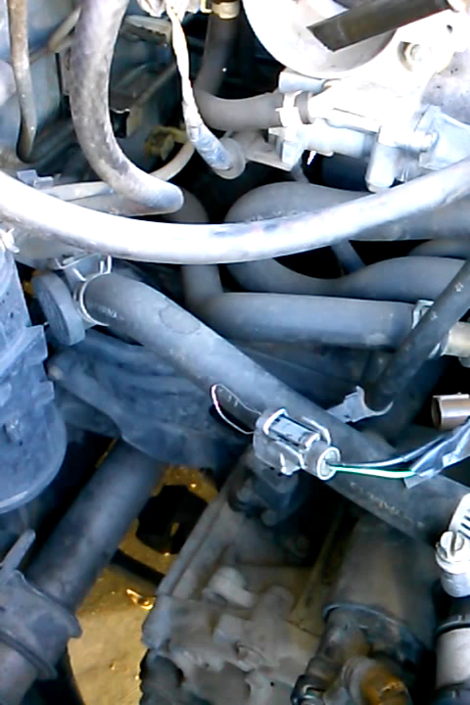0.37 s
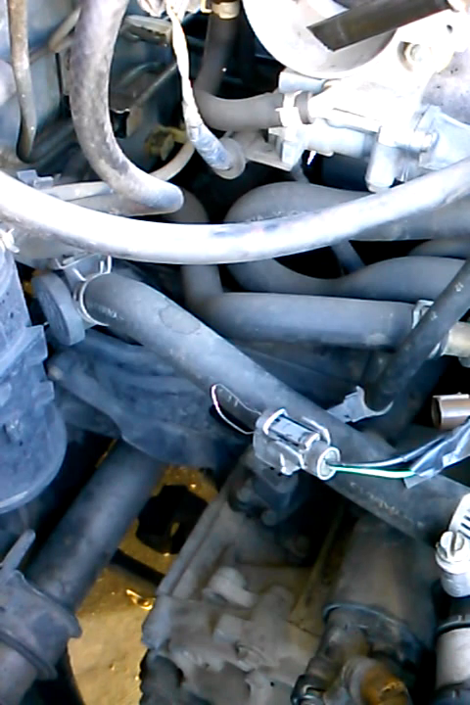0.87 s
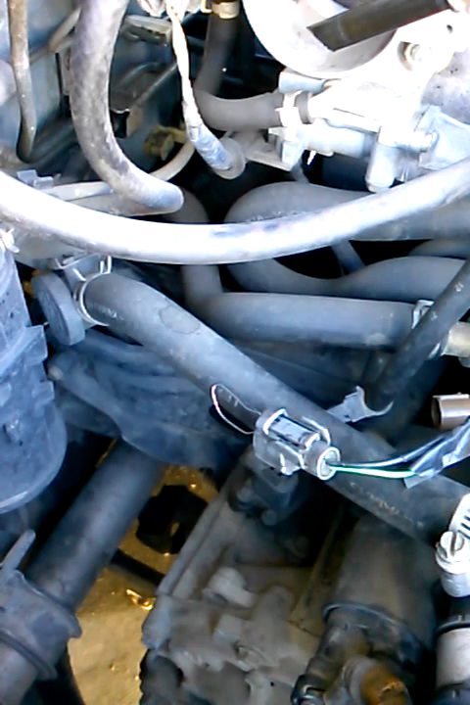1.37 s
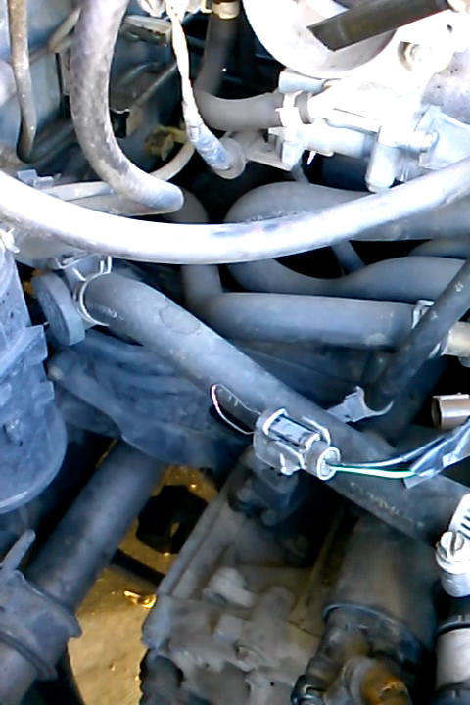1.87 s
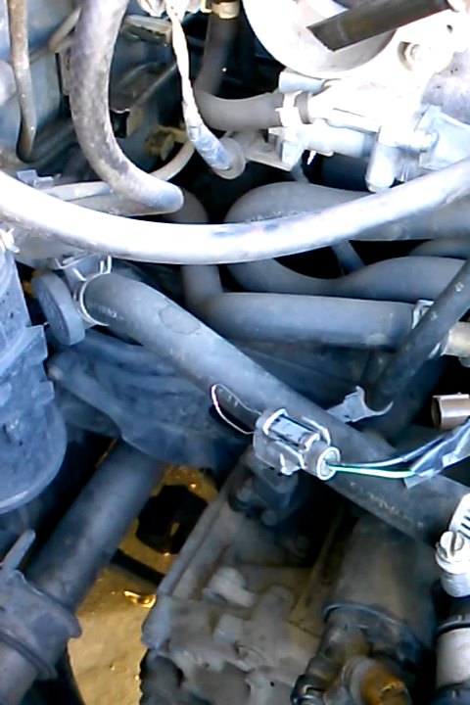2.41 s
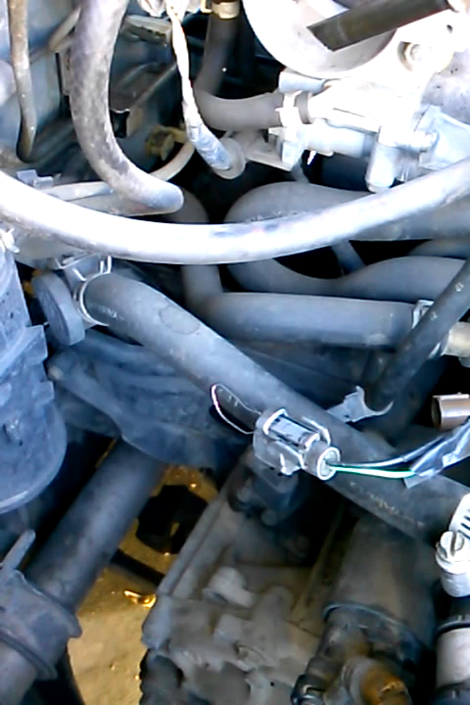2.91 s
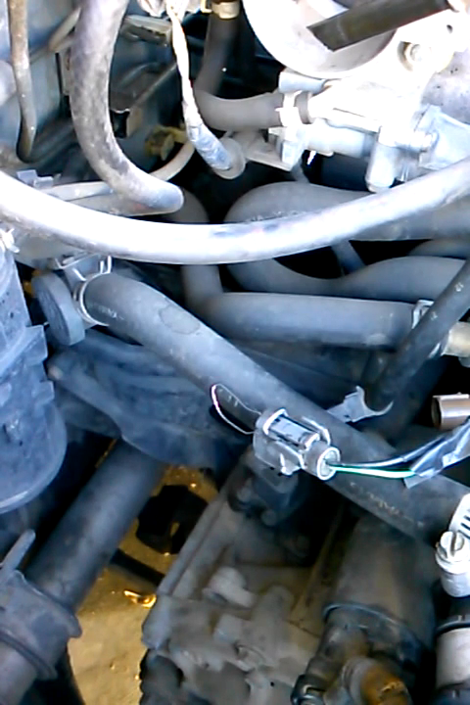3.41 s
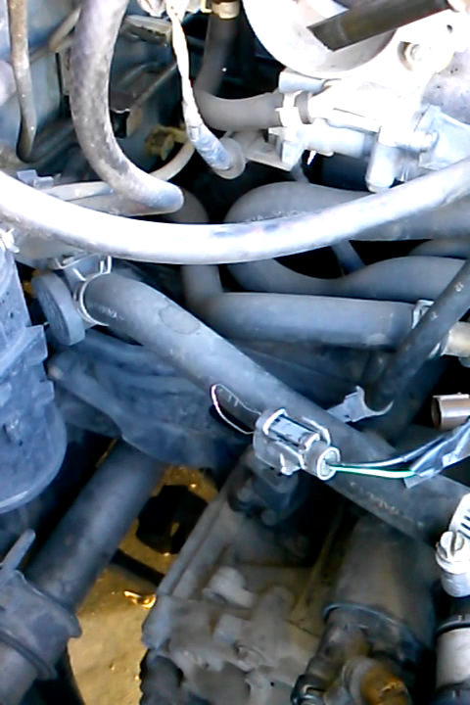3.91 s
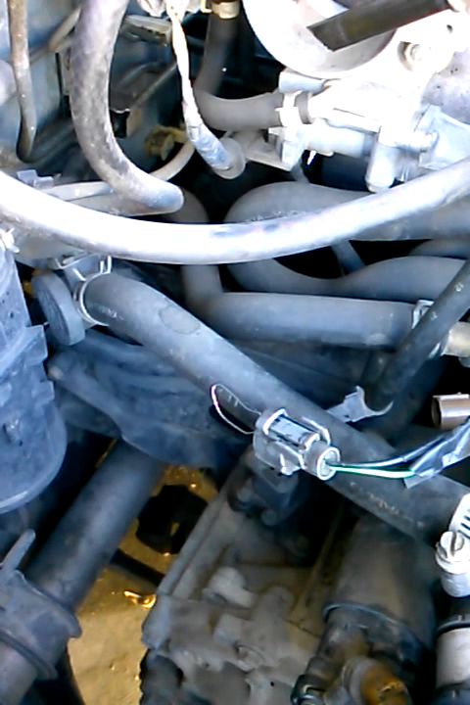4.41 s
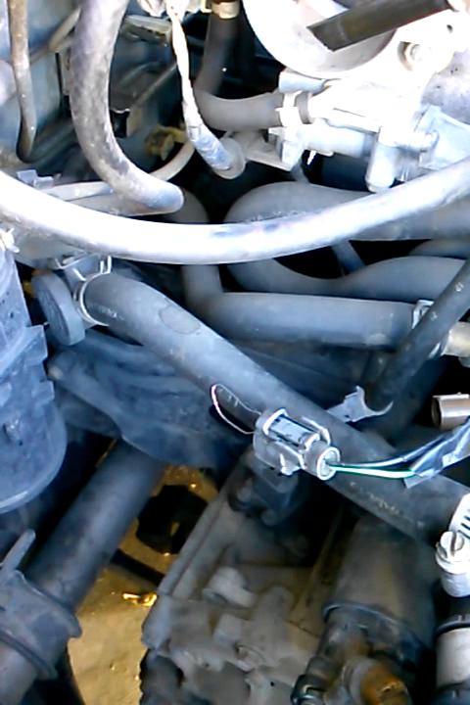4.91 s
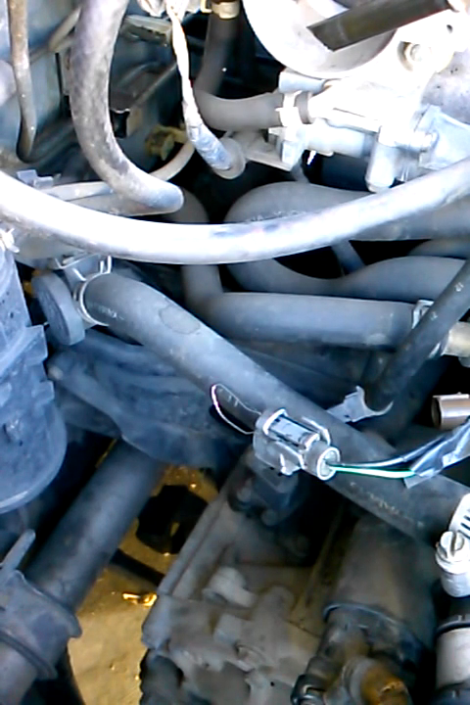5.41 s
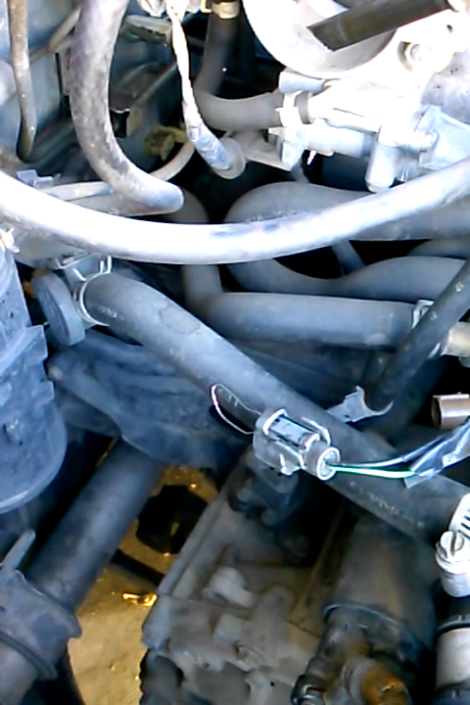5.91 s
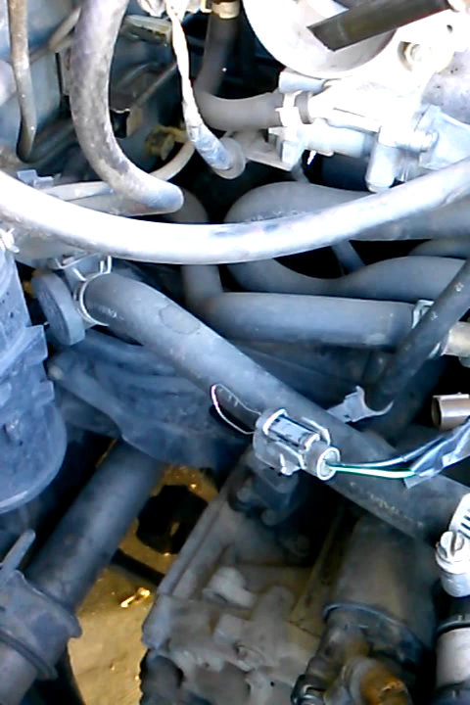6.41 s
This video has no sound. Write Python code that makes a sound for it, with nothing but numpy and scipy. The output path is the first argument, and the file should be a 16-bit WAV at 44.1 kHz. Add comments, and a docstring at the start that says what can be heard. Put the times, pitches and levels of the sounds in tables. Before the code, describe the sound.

In a car's engine bay outdoors, several relays click in a fast, bright cluster. An electric cooling fan starts immediately, its low roar and airy rush swelling within half a second. Then its draught strikes the close microphone: loud, irregular low thumps, fluttering gusts and slow heaves continue to the end, with the fan's hissing air behind them, ducking under the strongest blasts.

```python
"""An electric radiator fan spins up in a car's engine bay just after three relays click; its draught hits the microphone.
Blade air, low roar and brush hiss are filtered noises; the relays are chattering noise ringing their housings.
The draught is noise whose spectrum climbs with the air speed, plus lumpy gusts, snaps and slow heaves.
Quiet surroundings lie beneath, and the recorder's gain control ducks everything under the loud gusts."""
import sys
import numpy as np
from scipy import signal
from scipy.fft import rfft, irfft
from scipy.io import wavfile
from scipy.ndimage import uniform_filter1d

SR = 44100
rng = np.random.default_rng(int(sys.argv[2]) if len(sys.argv) > 2 else 0)


def makeup_ratio(level_db):
    """Linear amplitude ratio for a level in decibels (20 dB per factor of ten)."""
    decades = np.asarray(level_db, float) / 20
    return 10 ** decades


def transcribe(signal):
    """Save signal, clipped to [-1, 1], as a 16-bit WAV file at the path in sys.argv[1]."""
    frames = np.atleast_2d(signal).T
    limited = np.clip(frames, -1, 1)
    pcm = np.round(limited * 32767).astype(np.int16)
    wavfile.write(sys.argv[1], SR, pcm)


N = 288855
T = np.arange(N) / SR   # time, s

# quiet surroundings, relative spectrum: pitch_hz, density_db (per Hz)
YARD_SPECTRUM = [(20, -4), (30, 13), (120, 5.5), (680, -23), (1300, -17), (2000, -45), (4000, -37),
                 (13000, -40), (16000, -63)]
# relay contacts: start_s, peak_db of the ringing, brightness_db (per octave), chatter_s
CONTACTS = [(0.039, -7, 4, 0.0044), (0.043, -16.5, -3, 0.0069), (.068, -37, 15, .004),
            (0.0905, -12, 0, 0.0071), (0.1293, -13.5, -5, 0.0075), (0.138, -20, -19, 0.015),
            (0.16, -33, -4, 0.0054)]
# which relay each contact belongs to: index into RELAY_MODES
CONTACT_RELAY = [0, 0, 0, 1, 2, 1, 1]
# housing modes of each relay: pitch_hz, level_db, t60_s (before the extra treble damping)
RELAY_MODES = [
    [(304, -23.5, 0.21), (790, -15, 0.1), (1100, -15, 0.06), (1900, -38, 0.03), (2630, -20, 0.05),
     (3580, -26, 0.042), (3700, -35, 0.025), (4160, -15, 0.029), (4800, -38, 0.03), (6002, -37, 0.039),
     (6740, -16, 0.032), (8500, -24, 0.038), (9550, -14, 0.013), (10400, -37, 0.0053), (11600, -26, 0.0087)],
    [(600, -25, 0.15), (1344, -4, 0.18), (2450, -12, 0.028), (3470, -13.5, 0.15), (4420, -15, 0.02),
     (5600, -18, 0.077), (5930, -25, 0.04), (7800, -33, 0.05), (9000, -16, 0.02), (10300, -23, 0.11),
     (11700, -25, 0.065), (12400, -21, 0.064), (12100, -6, 0.065)],
    [(627, -16, 0.054), (2270, -5, 0.038), (2380, 0, 0.077), (3870, -32, 0.018), (4700, -2, 0.022),
     (7260, 4, 0.023), (9000, 3, 0.018), (9450, 3, 0.015), (11400, 12, 0.028), (12330, -6, 0.013)],
]
# fan air over time, dulling late on: time_s, airflow_db, treble_db (tilt above 2.5 kHz; -12.5 means no change)
FAN_COURSE = [(0.16, -38, -20), (0.21, -41.5, 1), (0.32, -32.5, -11.5), (0.45, -29, -15), (0.6, -33, -9),
              (0.655, -32, -13), (0.69, -31, -16), (0.9, -28.5, -14.5), (1.2, -28.5, -15.5),
              (2.0, -30, -15.5), (3.4, -28, -16.5), (4.1, -29, -15), (4.45, -27.5, -16.5), (4.73, -28, -16),
              (4.79, -28.5, -19), (4.93, -30.5, -25), (4.98, -28.5, -20), (5.7, -30, -21.5),
              (5.9, -33.5, -23.5), (6.55, -31, -22.5)]
# blade turbulence, relative spectrum: pitch_hz, density_db (per Hz)
FAN_AIR = [(350, -22), (500, -16), (700, -5), (900, -12), (1300, -19), (1620, -15.5), (2000, -24.5),
           (3000, -23.5), (4500, -25.5), (7500, -31.5), (9000, -30.5), (11500, -37.5), (13000, -42),
           (15000, -55)]
# shroud and motor resonances: pitch_hz, width_hz, gain_db (of the peak added to the air)
SHROUD = [(1166, 123, 3), (1818, 376, 2.5), (2555, 860, -2), (12050, 44, -20)]
# the rush swells and brightens: centre_s, length_s, pitch_hz, width_hz, gain_db (of the added peak)
SURGE = (0.58, 0.15, 1550, 2200, 1.5)
# reflections in the bay cancel some of the air: pitch_hz, width_hz, share cancelled (0-1)
BAY_DIPS = [(720, 260, .75), (1660, 220, .6)]
# moments when the fan's steady hiss comes up briefly: centre_s, rise_db
FLARES = [(4.066, 8), (4.146, 6.5), (4.178, 3), (5.315, 3), (6.06, 3)]
# spin-up: time_s, roar_db, brush_db
SPIN_UP = [(0.15, -46, -48), (0.25, -29.5, -54), (0.275, -24, -50.5), (0.45, -21.5, -45), (0.63, -19, -48),
           (0.68, -26, -50)]
# low roar, relative spectrum: pitch_hz, density_db (per Hz)
ROAR = [(15, -31), (30, 13), (60, 2.5), (100, 5), (220, 3.5), (330, -5), (600, -9), (800, -85), (1300, -94)]
# brush hiss resonances: pitch_hz, width_hz (of each of two passes), level_db (relative)
BRUSHES = [(4260, 120, -2), (4850, 200, -2), (8700, 940, -9), (11000, 1500, -13.5), (7500, 7600, -13)]
# buffeting at unshifted air speed, relative spectrum: pitch_hz, density_db (per Hz)
EDDIES = [(20, 1), (35, -3.5), (70, -2), (140, -9), (280, -15.5), (500, -28), (800, -43), (1600, -90)]
# the whole buffeting heaves or drops away: centre_s, change_db, length_s
SWINGS = [(0.675, 13, 0.03), (0.723, 4.5, 0.032), (0.815, 4, 0.052), (1.265, 0, 0.062), (1.336, 4, 0.006),
          (1.484, -15, 0.023), (1.68, -8.5, 0.094), (2.067, 3, 0.016), (2.127, -1, 0.036),
          (2.513, -5, 0.051), (2.55, 0.5, 0.066), (2.71, 1.5, 0.056), (2.83, 20, 0.0068),
          (2.861, -6, 0.024), (3.172, 13.5, 0.01), (3.284, 6, 0.048), (3.328, -10, 0.024),
          (3.583, 3, 0.022), (4.047, -16, 0.012), (4.121, -12, 0.065), (4.193, -6.5, 0.069),
          (4.427, 5.5, 0.21), (4.478, -18, 0.019), (4.703, -5, 0.074), (4.95, -5.5, 0.12),
          (5.213, 3, 0.018), (5.299, -9, 0.031), (5.464, 4.5, 0.16), (5.919, -9.5, 0.079),
          (6.049, -12, 0.058), (6.328, 8.5, 0.12), (6.55, -5, 0.032)]
# longer stretches of fast air: centre_s, speedup_oct, length_s
FAST_AIR = [(0.82, 0.32, 0.091), (1.707, 0.62, 0.26), (1.997, 0.58, 0.086), (2.25, 0.58, 0.15),
            (2.45, 0.44, 0.06), (2.58, 0.9, 0.085), (2.718, 0.53, 0.084), (2.95, 0.63, 0.13),
            (3.22, 0.46, 0.13), (3.444, 0.63, 0.11), (3.726, .7, 0.11), (4.393, 0.25, .15),
            (4.76, 0.37, 0.056), (5.438, 0.58, .12), (5.706, 0.74, 0.46), (6.09, .4, 0.056),
            (6.365, 0.35, 0.08)]
# sudden eddies, each in a spell of faster air: start_s, strength_db
GUSTS = [(0.804, -12), (0.842, -10), (0.906, -32), (0.934, -8), (1.054, -3), (1.123, -19.5), (1.17, -6.5),
         (1.209, -6), (1.251, -6.5), (1.311, -5), (1.388, -17), (1.434, -9), (1.501, -14), (1.61, -12),
         (1.668, -10), (1.694, -2), (1.791, 1), (1.875, -31), (1.976, 7), (2.054, -23), (2.091, -7.5),
         (2.147, -22), (2.183, -13), (2.229, -8), (2.246, 7.5), (2.258, 0), (2.323, -15), (2.356, -3),
         (2.39, -6), (2.428, -9.5), (2.453, -2.5), (2.526, -13.5), (2.544, -10), (2.586, -11), (2.608, -13),
         (2.63, -19), (2.664, -0.5), (2.69, -12), (2.729, -19), (2.762, -4.5), (2.807, -17), (2.83, -1),
         (2.9, -15.5), (2.991, -10.5), (3.024, -4.5), (3.114, -7.5), (3.165, -18), (3.224, -3),
         (3.294, -15), (3.352, -11), (3.399, 1.5), (3.451, 4.5), (3.493, -10.5), (3.529, -18), (3.631, -7),
         (3.681, -8), (3.701, -4), (3.744, 4), (3.795, -9), (3.816, -16), (3.918, -18.5), (4.017, -4),
         (4.075, -13), (4.211, -15), (4.266, -28), (4.3, -9.5), (4.345, -4), (4.381, -25), (4.434, -6.5),
         (4.497, -18), (4.584, -7), (4.679, -17), (4.733, -15), (4.755, -8.5), (4.823, -16.5),
         (4.933, -10.5), (5.064, -32), (5.134, -23), (5.173, -1.5), (5.256, -13), (5.329, -16),
         (5.381, -24), (5.42, -1), (5.488, -1.5), (5.567, -17.5), (5.665, 7), (5.703, -5.5), (5.763, 3.5),
         (5.802, -15), (5.833, -19.5), (5.863, -12), (5.95, -17), (6.003, -12), (6.076, -2), (6.099, -9),
         (6.119, -22), (6.156, -25), (6.23, -24), (6.272, -9.5), (6.345, -17.5), (6.389, -13), (6.419, -17),
         (6.459, -14.5)]
# finest eddies snapping at the port's edge: start_s, level_db (before a common lift), pitch_hz
SNAPS = [(1.171, -16, 603), (1.252, -10, 600), (1.312, -17, 600), (1.976, -11, 600), (2.055, -6.5, 656),
         (2.091, -11, 670), (2.23, -5, 600), (2.247, -3, 650), (2.257, -20, 600), (2.543, -5.5, 600),
         (2.804, -5, 600), (2.828, 0, 700), (3.398, -5, 615), (3.451, -15, 666), (3.632, -5, 630),
         (3.707, -7, 600), (3.745, -8, 700), (3.816, -6, 608), (5.172, -27, 600), (5.485, -20, 619),
         (5.664, -17, 600), (5.68, -13, 804), (5.708, -11, 754), (5.765, -6, 770), (5.865, -11.5, 670),
         (6.092, -12, 710), (6.28, -17, 660)]
# large slow eddies: centre_s, level_db (before a common lift), pitch_hz
HEAVES = [(0.714, -19, 47), (0.808, -5.6, 43.5), (0.873, -18, 54.7), (0.92, -6.5, 39.8), (0.964, -7.4, 68),
          (1.082, -10.5, 63), (1.123, -16, 57), (1.205, -9, 51.7), (1.248, 0, 43.4), (1.359, 0.5, 51),
          (1.417, -6.4, 53), (1.501, -7.5, 70), (1.563, -5, 52), (1.625, -6, 66.5), (1.681, -6, 47.4),
          (1.752, -18, 78.4), (1.798, -2, 59.4), (1.853, -16, 44), (1.933, -12, 47), (1.977, 3, 73),
          (2.08, -1.5, 53.4), (2.163, -3, 61), (2.245, -3, 61), (2.287, -1.5, 40), (2.332, -12, 67),
          (2.465, -7, 61), (2.559, -1, 43), (2.669, -11, 54.7), (2.709, -2, 54), (2.759, -19, 59),
          (2.823, -8, 66.5), (2.89, 1, 66), (2.97, -1, 46), (3.03, -12, 66.5), (3.069, 0, 66.5),
          (3.161, 0, 55), (3.292, 2.5, 53.7), (3.365, -8, 59), (3.481, -7.5, 59), (3.6, -5.2, 46),
          (3.677, -17, 39), (3.721, -4.1, 58), (3.771, -10, 74), (3.818, -4, 74), (3.893, -6.5, 55),
          (4.016, -8, 42.4), (4.086, -2.5, 46.3), (4.223, -6.7, 45.3), (4.262, -8, 51), (4.305, -6, 37.5),
          (4.349, -4.9, 56), (4.395, -5.4, 57.7), (4.455, -1, 78.5), (4.536, -7.7, 50.3), (4.582, -11, 49),
          (4.684, -8, 56.5), (4.74, -3, 84.6), (4.839, -7, 72.4), (4.893, -6.5, 55), (5.007, -15, 52.6),
          (5.068, -8.5, 53), (5.118, -6, 51.7), (5.213, -2.5, 38), (5.272, -12, 49), (5.341, -1, 51.4),
          (5.403, 0, 67), (5.447, -1, 57.6), (5.489, -7, 64), (5.541, -4, 78), (5.602, -6.5, 60),
          (5.69, -3.5, 59.5), (5.741, -10, 68), (5.812, -3.2, 69.4), (5.963, -2.5, 52.7), (6.091, -4, 64),
          (6.189, -11, 36), (6.231, -6, 58.4), (6.314, -3, 74), (6.363, -7.0, 56), (6.422, -7, 48)]


def in_time(rows):
    """Columns of a table, joined by straight lines in time."""
    s, *columns = np.transpose(rows)
    return [np.interp(T, s, c) for c in columns]


def at_hz(points, hz):
    """A spectrum read on a log-frequency axis."""
    return np.interp(np.log(hz), np.log(np.array(points)[:, 0]), np.array(points)[:, 1])


def bell(centre_s, length_s):
    """A smooth swell in time; length_s is its full width at 1/e."""
    return np.exp(-(2 * (T - centre_s) / length_s) ** 2)


def rms_one(x):
    """Scaled to rms 1."""
    return x / np.sqrt(np.mean(x ** 2) + 1e-20)


def drift(corner_hz):
    """Slow random wander of rms 1: noise through two equal one-pole low-passes, made at SR / 40."""
    r = np.exp(-2 * np.pi * corner_hz * 40 / SR)
    white = rng.standard_normal(N // 40 + 2002)
    slow = signal.lfilter([1], [1, -2 * r, r * r], white)[2000:]   # skip the filter's settling
    return np.interp(np.arange(N) / 40, np.arange(len(slow)), rms_one(slow))


def bands(low_hz, high_hz, gain_db):
    """Third-octave bands of noise, each scaled by gain_db(centre Hz), which may move in time."""
    edges = low_hz * 2 ** (np.arange(int(3 * np.log2(high_hz / low_hz)) + 1) / 3)
    white = rng.standard_normal((2, N + SR // 4))   # neighbouring bands use different noise
    out = 0
    for k, (low, high) in enumerate(zip(edges, edges[1:])):
        band_pass = signal.butter(2, [low, high], "band", fs=SR, output="sos")
        band = signal.sosfilt(band_pass, white[k % 2])
        out = out + band[-N:] * makeup_ratio(gain_db(np.sqrt(low * high)))
    return out


def shaped(spectrum):
    """Steady noise with the given spectrum; rms 1."""
    hz = np.arange(1, N // 2 + 2) * SR / N
    return rms_one(irfft(rfft(rng.standard_normal(N)) * makeup_ratio(at_hz(spectrum, hz)), N))


def resonance(x, hz, width_hz):
    """A two-pole peak of gain 1."""
    r = np.exp(-np.pi * width_hz / SR)
    poles = [1, -2 * r * np.cos(2 * np.pi * hz / SR), r * r]
    return signal.lfilter([(1 - r * r) / 2, 0, (r * r - 1) / 2], poles, x)


def yard():
    """Quiet surroundings: steady noise with a fixed spectrum."""
    return makeup_ratio(-38) * shaped(YARD_SPECTRUM)


def relays():
    """Chattering contacts strike and ring their housings; the bay smears the same colours into a short tail."""
    strike_db, crack_db, crack_hz = 14.5, -18, 4500
    tail_db, tail_s = -13, 0.024
    broad_ratio, broad_db = 9, 2   # a wider, quicker ring at the pitch of each mode
    damping_db_s = 200   # extra decay at 10 kHz, in proportion to pitch
    out, t = np.zeros(N), np.arange(SR // 5) / SR
    for (start_s, peak_db, colour_db, chatter_s), which in zip(CONTACTS, CONTACT_RELAY):
        shape = np.exp(-(t / chatter_s) ** 2) + makeup_ratio(tail_db) * np.exp(-t / tail_s)
        onset = 1 - np.exp(-t / .0006)
        chatter = rng.standard_normal(len(t)) * shape * onset
        chatter[SR // 2000] += makeup_ratio(strike_db)   # the first blow of the armature
        body = 0
        for hz, level_db, t60_s in RELAY_MODES[which]:
            width_hz = np.log(1000) / (np.pi * t60_s)
            size = makeup_ratio(level_db + colour_db * np.log2(hz / 4000)) / np.sqrt(width_hz)
            damping = makeup_ratio(-damping_db_s * t * hz / 10000)
            narrow = resonance(chatter, hz, width_hz)
            broad = resonance(chatter, hz, width_hz * broad_ratio)
            body = body + size * damping * (narrow + makeup_ratio(broad_db) * broad)
        crack = signal.lfilter(*signal.butter(1, crack_hz, fs=SR), chatter)
        at = round(start_s * SR)
        out[at:at + len(t)] += makeup_ratio(peak_db) * (body / np.abs(body).max() + makeup_ratio(crack_db) * crack)
    return out


def slowness():
    """How far the blades still are from speed: 1 at the start, decaying exponentially."""
    return np.exp(-np.maximum(T - SPIN_UP[0][0], 0) / 0.15)


def treble_tilt(hz):
    """Treble change in dB over time: none below 2.5 kHz, growing with pitch above it."""
    mean_treble_db = -12.5
    treble_db = in_time(FAN_COURSE)[1]
    return (treble_db - mean_treble_db) * np.clip(np.log2(hz / 2500) / 2, 0, 1.2)


def blade_air():
    """Blade turbulence: banded noise coloured by shroud resonances and by cancelling reflections."""
    patchy_db, slow_db_oct, flare_s = 1.0, 13.0, .018
    slow = slowness()

    def gain_db(hz):
        # slow blades make little above 1 kHz; the rush brightens as the speed climbs
        dull_db = -slow_db_oct * slow * np.clip(np.log2(hz / 1000), 0, 2)
        return at_hz(FAN_AIR, hz) + treble_tilt(hz) + dull_db + patchy_db * drift(27.0)

    air = rms_one(bands(332.6, 17000, gain_db))
    air = air + sum(makeup_ratio(db) * resonance(air, hz, width_hz) for hz, width_hz, db in SHROUD)
    centre_s, length_s, hz, width_hz, gain = SURGE
    air = air + makeup_ratio(gain) * bell(centre_s, length_s) * resonance(air, hz, width_hz)
    for hz, width_hz, share in BAY_DIPS:
        air = air - share * resonance(air, hz, width_hz)
    flow_db = in_time(FAN_COURSE)[0]
    flow_db = flow_db + sum(rise_db * bell(s, flare_s) for s, rise_db in FLARES)
    return makeup_ratio(flow_db) * air


def roar():
    """Low rumble under the fan: steady shaped noise that follows the spin-up."""
    return makeup_ratio(in_time(SPIN_UP)[0]) * shaped(ROAR)


def brush_hiss():
    """The motor's brushes hiss: noise passed twice through each resonance."""
    rise_db_s = 0.5   # slow rise after the spin-up
    level_db = in_time(SPIN_UP)[1] + rise_db_s * np.maximum(T - SPIN_UP[-1][0], 0)
    level_db = level_db + treble_tilt(7700) * (1 - slowness())   # once running, it follows the air's treble
    white, hiss = rng.standard_normal(N), 0
    for hz, width_hz, db in BRUSHES:
        once = resonance(white, hz, width_hz)
        hiss = hiss + makeup_ratio(db) * resonance(once, hz, width_hz)
    return makeup_ratio(level_db) * rms_one(hiss)


def fan():
    """Blade air, low roar and brush hiss, faded in over 30 ms as the motor starts."""
    running = np.clip((T - SPIN_UP[0][0]) / .03, 0, 1)
    return running * (blade_air() + roar() + brush_hiss())


def air_speed():
    """Air speed at the port in octaves: chance flutter, fast stretches, and a spurt and spell at each gust."""
    calm_oct, flutter_oct = -0.69, .38
    gust_floor_db, db_per_octave = -29.5, 11.0   # how gust strength turns into speed
    rise_s, spell_s, spell_share = 0.0049, 0.019, 0.89   # spurt's rise; the spell's 1/e half-length and size
    speed_oct = calm_oct + flutter_oct * np.minimum(drift(51.5), 1.3)   # chance alone gives only mild flares
    speed_oct += sum(up_oct * bell(s, length_s) for s, up_oct, length_s in FAST_AIR)
    for start_s, strength_db in GUSTS:
        near = slice(max(round((start_s - .2) * SR), 0), round((start_s + .3) * SR))
        since = T[near] - start_s
        u = np.maximum(since / rise_s, 0)
        spurt = u * np.exp(1 - u)
        spell = spell_share * np.exp(-((since - rise_s) / spell_s) ** 2)
        up_oct = max(strength_db - gust_floor_db, 0) / db_per_octave * .5
        speed_oct[near] += up_oct * (spurt + spell)
    return speed_oct


def buffeting():
    """Eddies sweep past the port: faster air shifts their whole spectrum upwards, so gusts flare into the mids."""
    lift_db, wander_db = 17, 1.36
    reach_oct, thump_db, lumpy_db = 1.66, 4.5, 0.5
    arrives_s, builds_s = 0.652, 0.16
    port_hz = 700   # the port smooths finer eddies
    shift = 2 ** (reach_oct * np.tanh(air_speed() / reach_oct))   # the speed levels off at its extremes
    thumps = drift(68.6)

    def gain_db(hz):
        # the same power spread over a wider range: less of it per Hz
        spread_db = at_hz(EDDIES, hz / shift) - 10 * np.log10(shift)
        # all but the slowest swings rise and fall together
        together_db = thump_db * np.clip(np.log2(hz / 25) / 3, 0, 1) * thumps
        return spread_db + together_db + lumpy_db * drift(22.0)

    eddies = bands(16.06, 2100, gain_db)
    eddies = signal.sosfilt(signal.butter(4, port_hz, fs=SR, output="sos"), eddies)
    level_db = lift_db + wander_db * drift(4.3)
    level_db = level_db + sum(change_db * bell(s, length_s) for s, change_db, length_s in SWINGS)
    arrived = np.clip((T - arrives_s) / builds_s, 0, 1)
    return arrived * makeup_ratio(level_db) * eddies


def gust_cores():
    """Each sudden eddy's core passes as a few quick swings that slow and die, on a broader push of pressure."""
    swing_db, push_db = 4.5, 0.5
    typical_hz, typical_db = 330, -10
    spread_oct, oct_per_db = .2, .05   # chance spread of pitch; stronger cores are higher
    decay_turns, sag = 1.47, 0.27   # 1/e decay; pitch falls as 1 / (1 + sag * turns)
    out = np.zeros(N)
    for (start_s, strength_db), (side, chance) in zip(GUSTS, rng.random((len(GUSTS), 2))):
        near = slice(max(round((start_s - .2) * SR), 0), round((start_s + .3) * SR))
        since = T[near] - start_s
        pitch_oct = spread_oct * (2 * chance - 1) + oct_per_db * (strength_db - typical_db)
        core_hz = typical_hz * 2 ** pitch_oct
        turns = np.maximum(since - .0015, 0) * core_hz
        swings = np.sin(2 * np.pi * np.log1p(sag * turns) / sag)
        swings = swings * np.tanh(2 * turns) * np.exp(-turns / decay_turns)
        v = np.clip((since - .003) * np.pi * np.sqrt(2) * core_hz / 3, -5, 5)
        push = (1 - 2 * v ** 2) * np.exp(-v ** 2)
        polarity = np.sign(side - .5)
        out[near] += polarity * makeup_ratio(strength_db) * (makeup_ratio(swing_db) * swings + makeup_ratio(push_db) * push)
    return out


def snaps():
    """The finest eddies snap at the port's edge: sine bursts of a cycle or two."""
    lift_db, half_cycles = 1.5, 0.76   # common lift; 1/e half-width of the burst
    out = np.zeros(N)
    for start_s, level_db, hz in SNAPS:
        near = slice(round((start_s - .01) * SR), round((start_s + .01) * SR))
        turns = (T[near] - start_s) * hz - 2 * half_cycles
        out[near] += makeup_ratio(level_db + lift_db) * np.sin(2 * np.pi * turns) * np.exp(-(turns / half_cycles) ** 2)
    return out


def draught():
    """The fan's air reaching the port: buffeting with gust cores and snaps on top."""
    return buffeting() + gust_cores() + snaps()


def heaves():
    """Large slow eddies heave the diaphragm: each a swing or two of pressure that swells and fades."""
    lift_db, half_cycles = 3.5, 0.55
    out = np.zeros(N)
    for (centre_s, level_db, hz), phase in zip(HEAVES, rng.random(len(HEAVES))):
        near = slice(round((centre_s - .08) * SR), round((centre_s + .08) * SR))
        turns = (T[near] - centre_s) * hz
        swell = np.exp(-(turns / half_cycles) ** 2)
        out[near] += makeup_ratio(level_db + lift_db) * np.cos(2 * np.pi * (turns + phase)) * swell
    return out


def scene():
    """All sources at one microphone."""
    return (yard() + relays() + fan() + draught() + heaves())[None]


def roll_off(x):
    """The treble ends steeply here."""
    return signal.sosfilt(signal.butter(12, 15730, fs=SR, output="sos"), x)


def record(dry):
    """The capsule rolls off at the top; fast gain control pulls loud gusts down and recovers; peaks are rounded."""
    capsule_hz, ceiling = 15500, .97
    knee_db, squeeze = -16.0, 0.46   # squeeze: dB cut per dB above the knee
    release_db_s, attack_s = 121.0, 0.0028
    dry = signal.sosfilt(signal.butter(4, capsule_hz, fs=SR, output="sos"), dry)
    level_db = 10 * np.log10(uniform_filter1d(dry ** 2, size=441) + 1e-12)
    # hold each peak and let it fall at the release rate
    fall_db = release_db_s * T
    held_db = np.maximum.accumulate(level_db + fall_db, axis=1) - fall_db
    r = np.exp(-1 / (attack_s * SR))
    cut_db = signal.lfilter([1 - r], [1, -r], squeeze * np.maximum(held_db - knee_db, 0))
    fade = np.minimum(np.arange(N)[::-1] / (.004 * SR), 1)   # the last milliseconds fade out
    x = dry * fade * makeup_ratio(-cut_db) / ceiling
    mix = ceiling * x / (1 + x ** 6) ** (1 / 6)
    return roll_off(mix)


dry = scene()
out = record(dry)
transcribe(out)
```